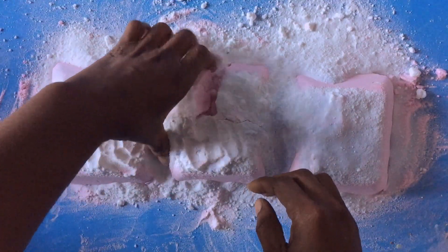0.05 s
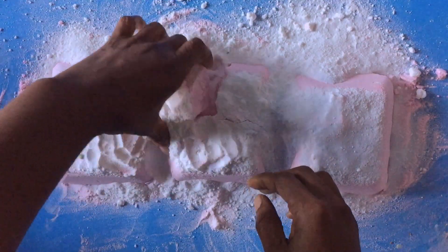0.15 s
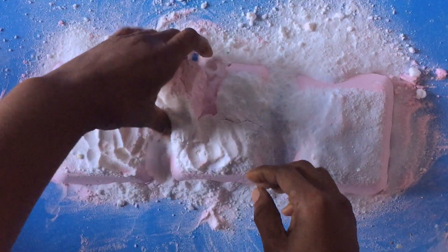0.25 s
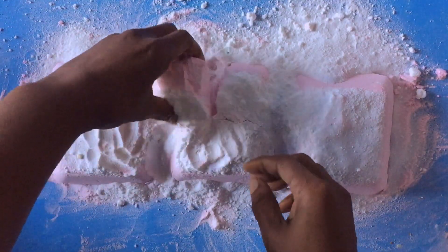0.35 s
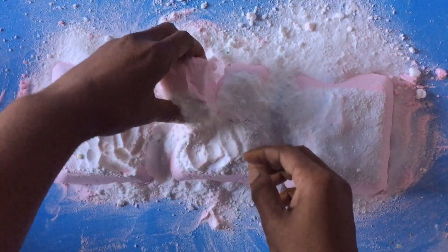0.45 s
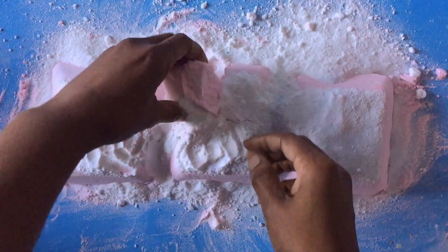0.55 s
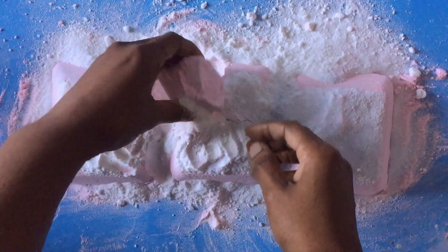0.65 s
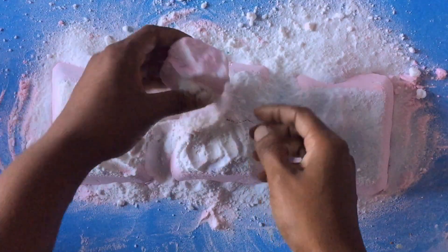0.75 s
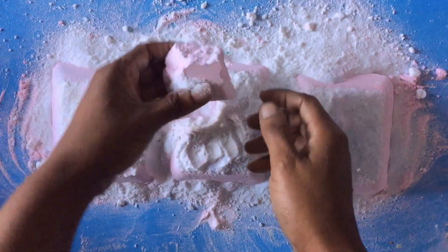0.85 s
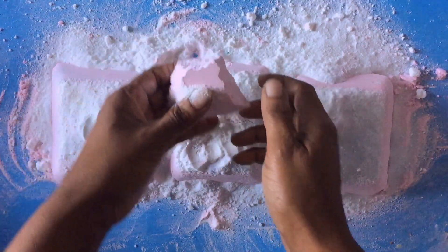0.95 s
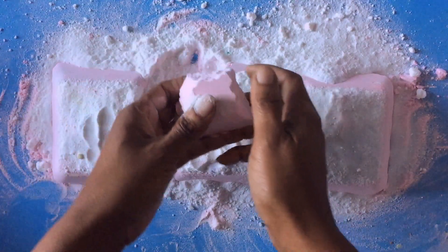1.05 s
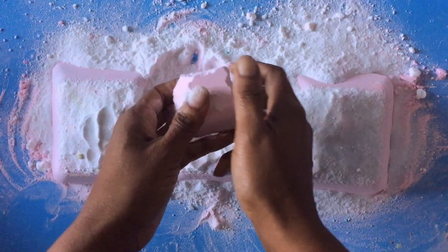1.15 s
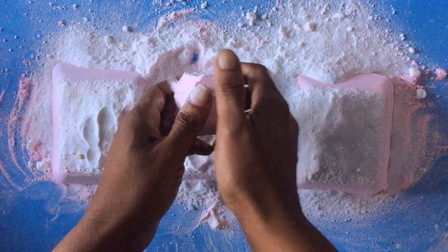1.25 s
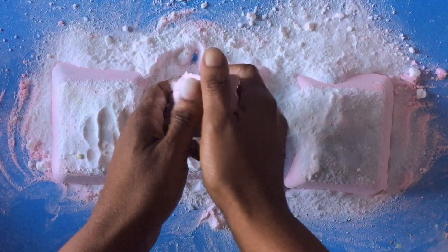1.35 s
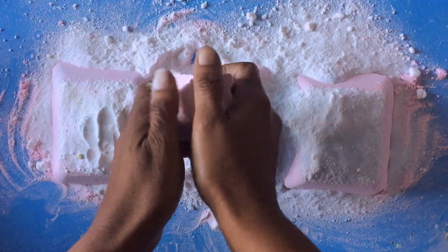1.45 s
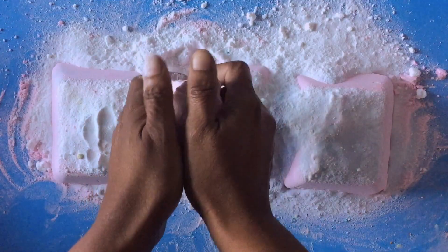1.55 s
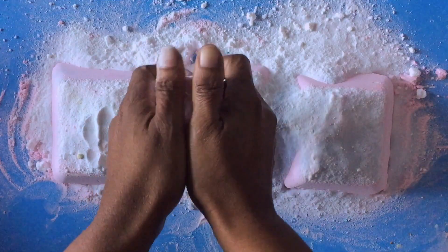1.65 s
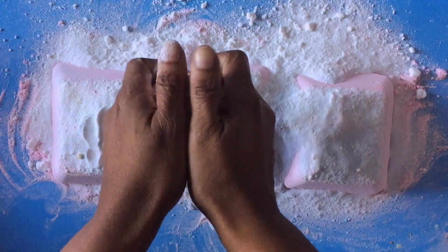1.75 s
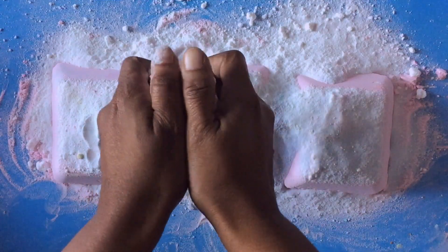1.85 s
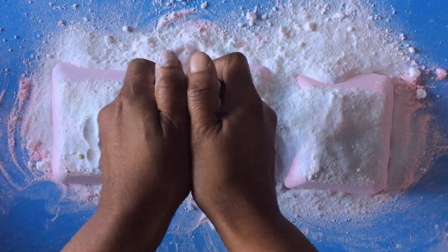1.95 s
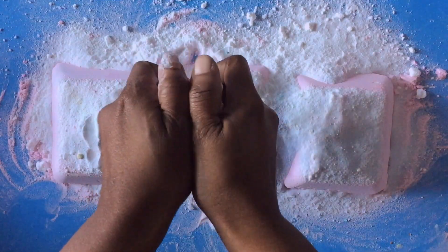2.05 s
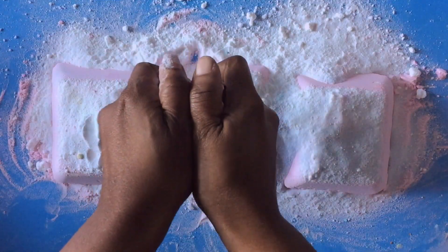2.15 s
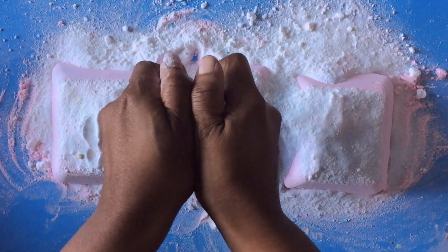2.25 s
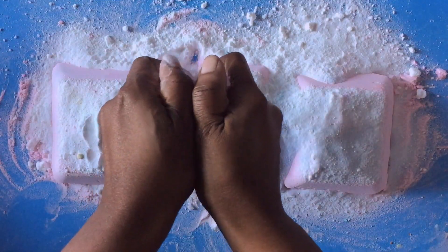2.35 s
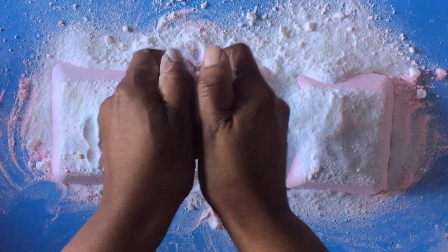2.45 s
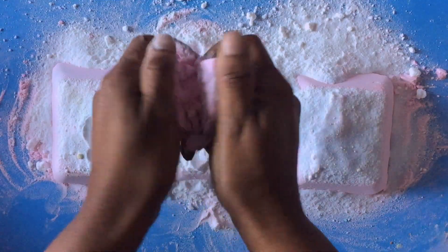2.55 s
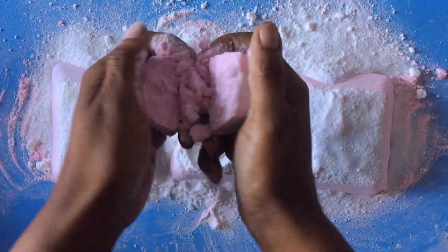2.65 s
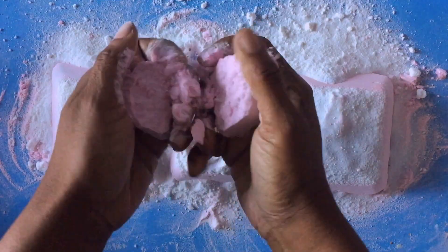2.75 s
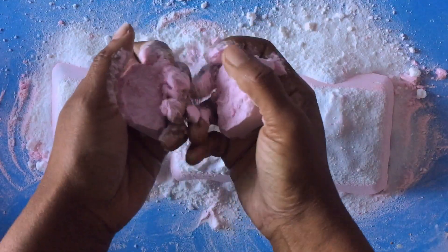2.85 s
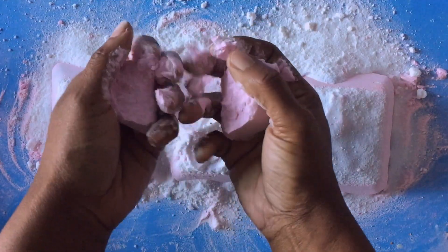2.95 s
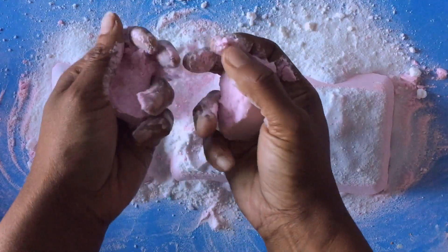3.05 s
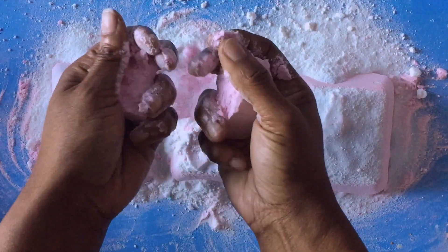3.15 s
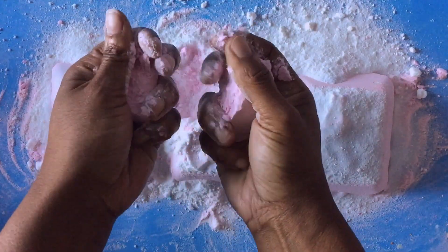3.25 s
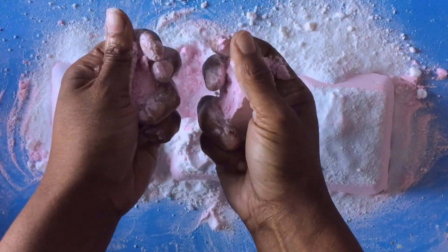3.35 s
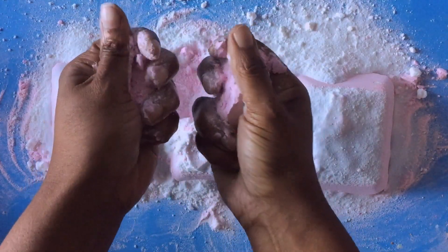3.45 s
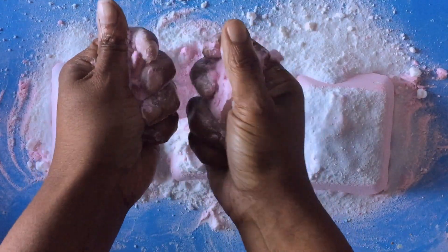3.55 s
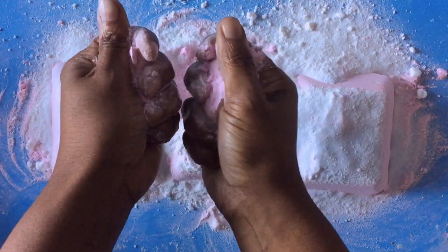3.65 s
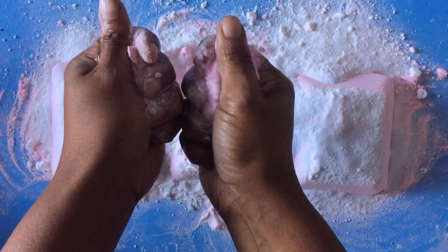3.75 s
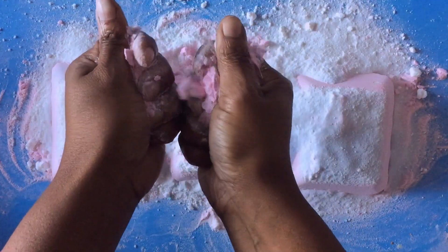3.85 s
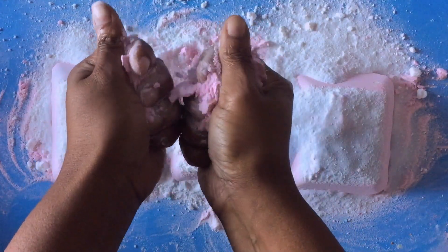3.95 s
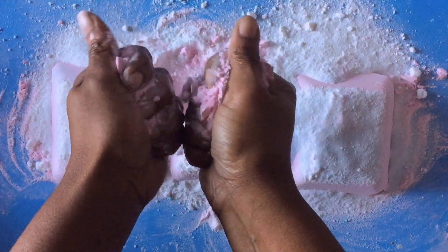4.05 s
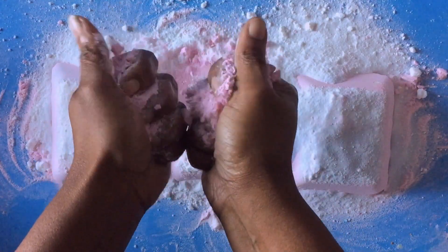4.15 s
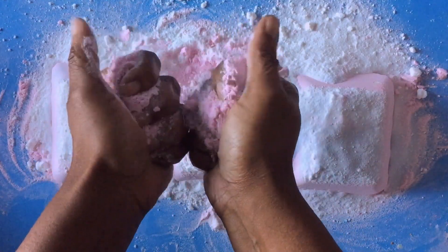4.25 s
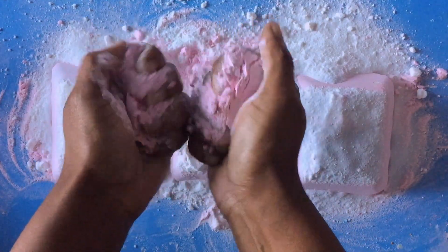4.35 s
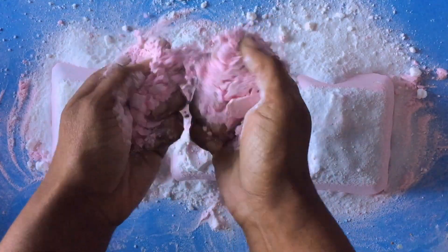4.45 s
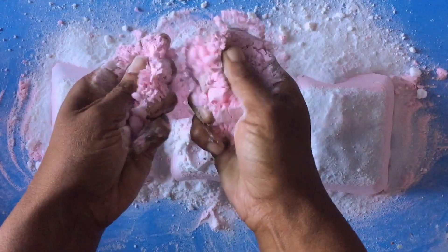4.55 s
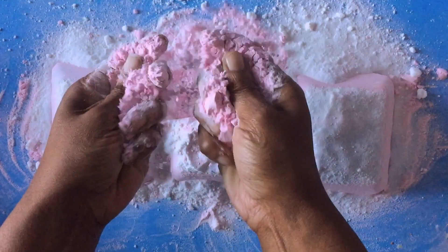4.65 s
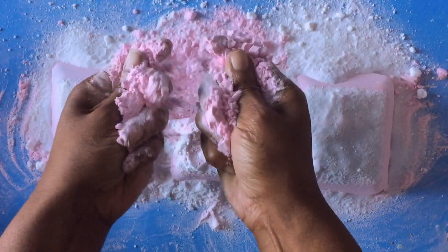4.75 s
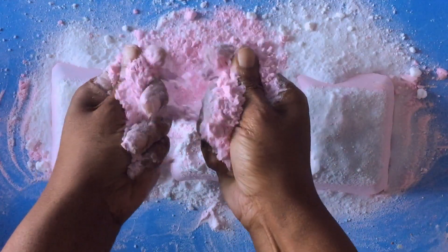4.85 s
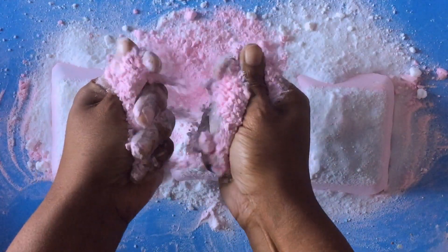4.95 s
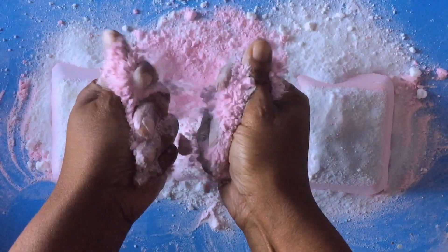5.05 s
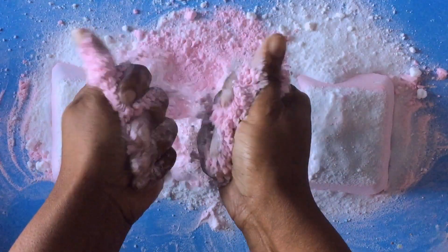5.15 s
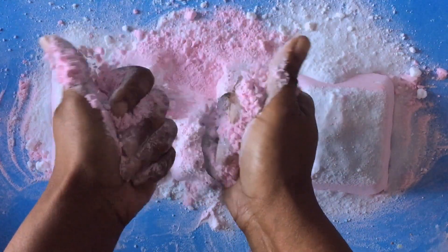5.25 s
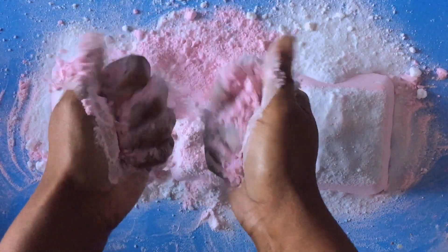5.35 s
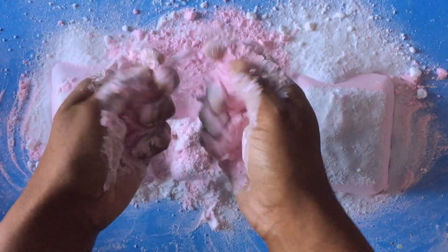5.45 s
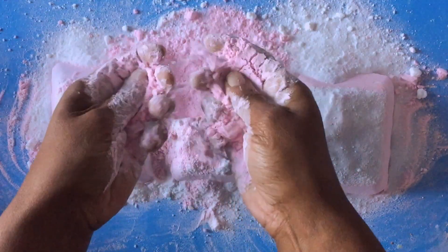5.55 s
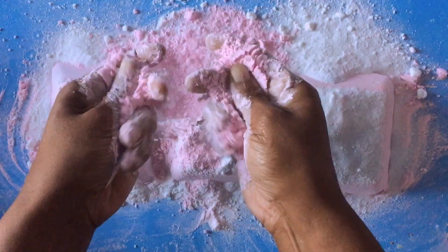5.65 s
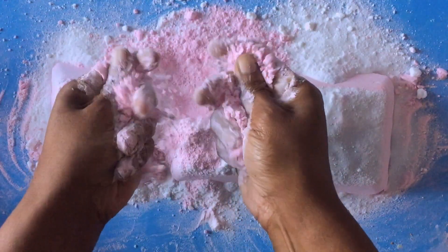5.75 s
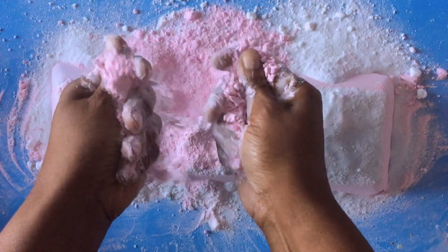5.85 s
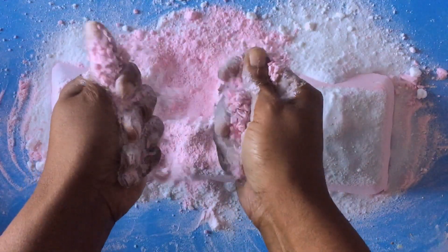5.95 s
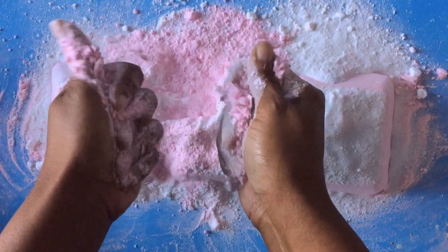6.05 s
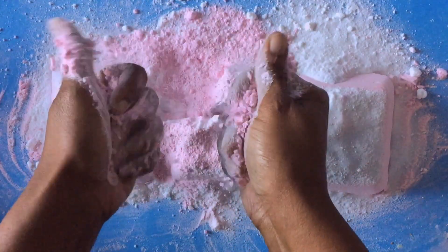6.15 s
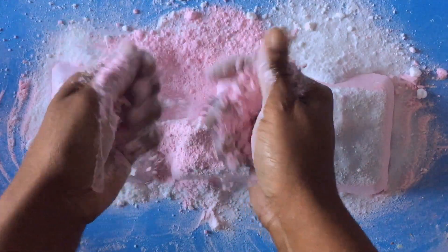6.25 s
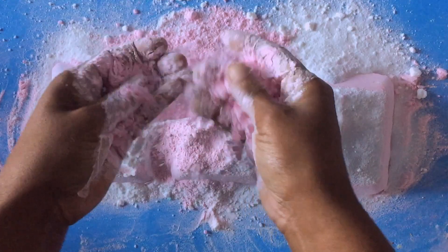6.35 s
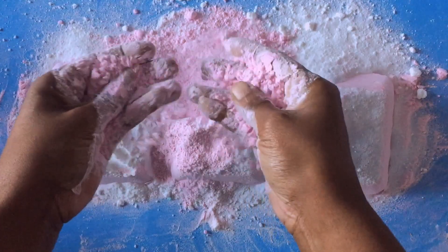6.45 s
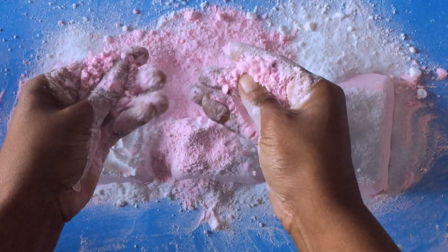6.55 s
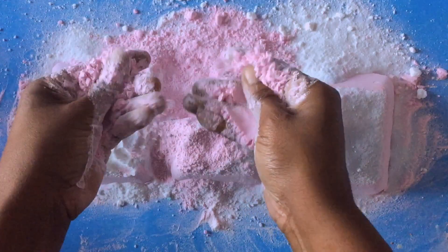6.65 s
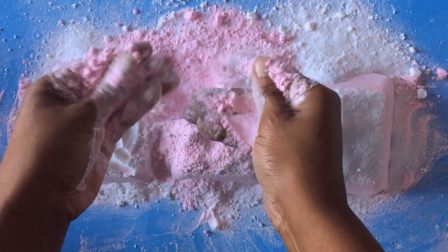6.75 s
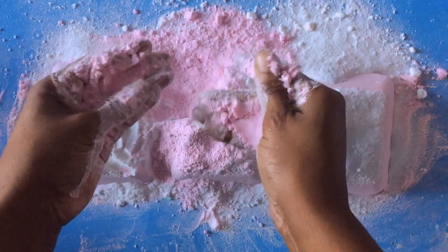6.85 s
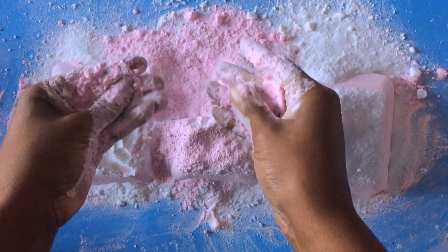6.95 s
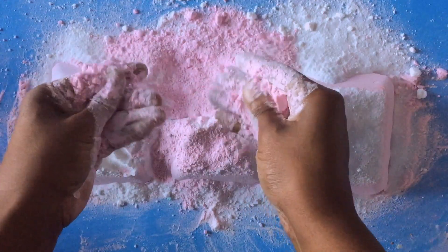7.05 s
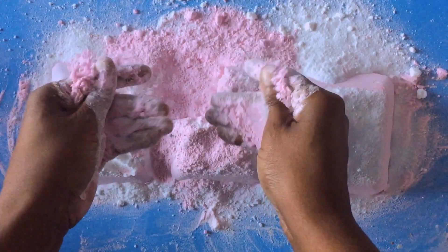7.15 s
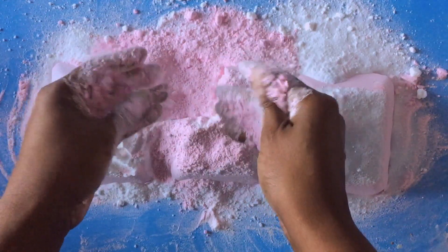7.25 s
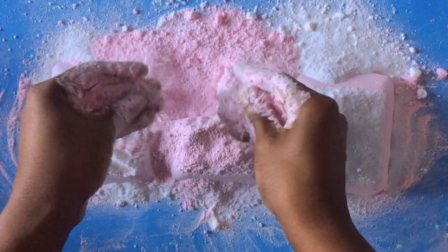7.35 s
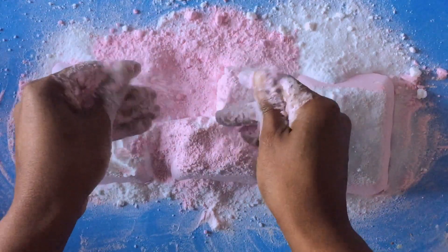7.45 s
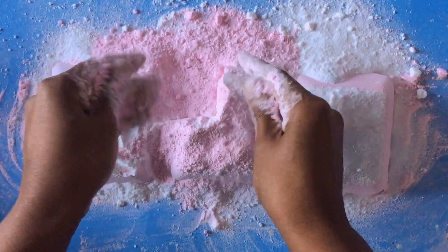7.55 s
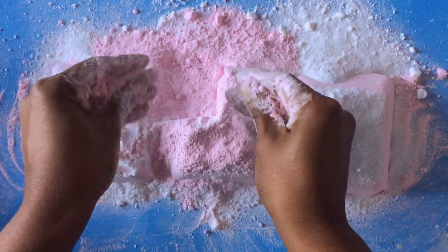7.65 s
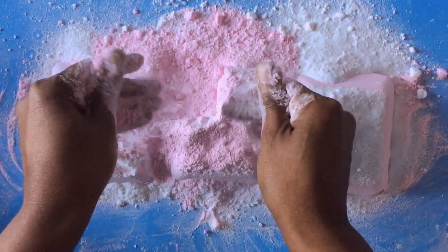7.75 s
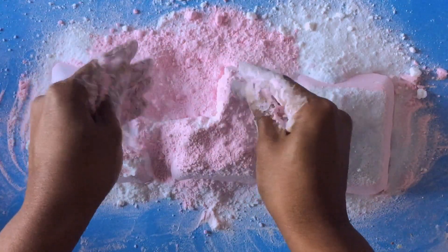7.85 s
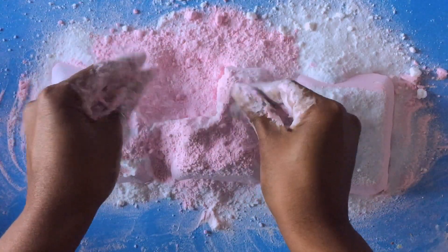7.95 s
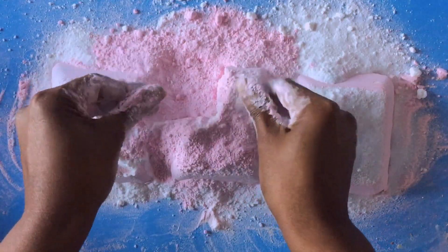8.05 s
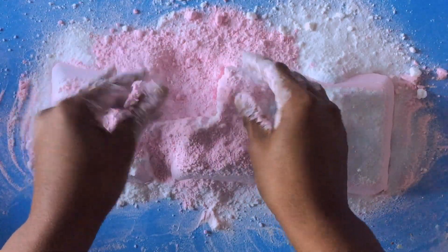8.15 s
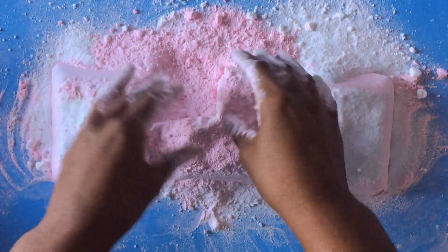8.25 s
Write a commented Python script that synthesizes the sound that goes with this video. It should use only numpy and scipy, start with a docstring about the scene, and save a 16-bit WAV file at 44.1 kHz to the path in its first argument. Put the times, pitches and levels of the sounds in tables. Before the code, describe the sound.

Hands squeeze a lump of packed starch close up; it cracks, creaks and crunches in jerks, then crumbles into soft powdery finger rubbing.

```python
"""A quiet room: two hands crush a lump of packed starch close to a microphone, over a tray.
The powder yields in stick-slip jerks, sums of damped grains that ring the lump; even creaks are slip trains.
Lumps snap as decaying noise bursts, one break thumps on the tray's modes, powdered fingers rub as moving
bands of hiss, and fingertips scrape as gritty noise.
Shaped noise makes a low rumble, and a sine of unsteady pitch and level makes a wavering hum."""
import sys
import numpy as np
from scipy import signal
from scipy.fft import rfft, irfft, next_fast_len
from scipy.io import wavfile
from scipy.ndimage import map_coordinates

SR = 44100
rng = np.random.default_rng(int(sys.argv[2]) if len(sys.argv) > 2 else 0)


def magnitude_from_level(level_db):
    """Linear magnitude for a level in decibels (20 dB per decade)."""
    exponent = np.asarray(level_db, float) / 20
    return 10 ** exponent


def store_wav(level_fs):
    """Save 16-bit WAV to argv[1]."""
    pcm = np.round(np.clip(np.atleast_2d(level_fs), -1, 1) * 32767)
    wavfile.write(sys.argv[1], SR, pcm.T.astype(np.int16))


N = 366030


def unit(x):
    """Normalization: scales x to rms 1."""
    return x / np.sqrt(np.mean(x ** 2) + 1e-20)


def curves(rows):
    """Linear interpolation: one value per sample for each column after the time."""
    s, *cols = np.transpose(rows)
    return [np.interp(np.arange(N) / SR, s, c) for c in cols]


def filtered(x, response):
    """Linear filtering: the spectrum of x times a complex response of frequency."""
    m = next_fast_len(N + 8192)
    return irfft(rfft(x, m) * response(np.fft.rfftfreq(m, 1 / SR)), m)[:N]


def peak(f, hz, width):
    """Damped resonance: a causal second-order response of gain 1 at hz."""
    return 1j * f * width / (hz * hz - f * f + 1j * f * width)


def noise(spectrum):
    """Spectral shaping: noise of rms 1 coloured by (frequency [Hz], level [dB]) points."""
    hz, db = np.transpose(spectrum)
    white = rng.standard_normal(N)
    return unit(filtered(white, lambda f: magnitude_from_level(np.interp(np.log(f + 1), np.log(hz + 1), db))))


def wobble(rate):
    """Band-limited fluctuation: a smooth random curve with rate knots a second."""
    knots = rng.standard_normal(int(N * rate / SR) + 4)
    return map_coordinates(knots, [np.arange(N) * rate / SR])


def scatter(times, shapes):
    """Superposition: adds each row of shapes at its time."""
    starts = np.round(np.asarray(times) * SR).astype(int)[:, None]
    at = starts + np.arange(shapes.shape[1])
    return np.bincount(at.ravel(), shapes.ravel(), N + shapes.shape[1])[:N]


def grains(times, size, spread, hz, cycles, length):
    """Damped oscillation: pushes of log-normal pitch whose decay constant is counted in cycles."""
    f = np.clip(hz * np.exp(spread), 60, 15000)[:, None]
    t = np.arange(length) / SR
    onset = 1 - np.exp(-t / 0.00013)
    pushes = size[:, None] * np.sin(2 * np.pi * f * t) * np.exp(-f * t / cycles) * onset
    return unit(scatter(times, pushes))


def bursts(hz, octaves, t60, tail_db):
    """Fracture noise: rows of band noise around hz with a fast and a slow decay, each of peak 1."""
    t, f = np.arange(2048) / SR, np.fft.rfftfreq(2048, 1 / SR)
    white = rng.standard_normal((len(hz), len(t)))
    band = irfft(rfft(white) * np.exp(-(np.log2((f + 1) / hz) / octaves) ** 2))
    decay = magnitude_from_level(-60 * t / t60) + magnitude_from_level(tail_db - 60 * t / 0.1)
    rows = band * decay * (1 - np.exp(-(t / 0.00075) ** 2))
    return rows / np.abs(rows).max(axis=1, keepdims=True)


def room():
    """Stationary background: shaped rumble and hiss, resonant noise bands and one wavering sine."""
    # Spectrum of the rumble and hiss, scaled as a whole below: (frequency [Hz], relative density [dB per Hz])
    room_spectrum = [(4.7, -30), (8.0, 8.5), (57, -5.5), (77, -10.5), (131, -11), (181, -24.5),
                     (240, -16.5), (273, -27), (364, -25), (550, -33), (886, -37.5), (2370, -42.5),
                     (4340, -45.5), (4930, -50), (16000, -87)]
    # Narrow rumble bands, two equal resonances each: (frequency [Hz], width of one [Hz], level [dB])
    hum_bands = [(50, 10.6, -54), (121.9, 10.4, -70), (366.5, 37, -83.5)]
    # Wavering tone: (centre frequency [Hz], level before a lift of 2 dB [dB])
    drone_tone = (244, -68)
    hum = 0
    for hz, width, db in hum_bands:
        white = rng.standard_normal(N)
        hum = hum + magnitude_from_level(db) * unit(filtered(white, lambda f: peak(f, hz, width) ** 2))
    drone_hz, drone_db = drone_tone
    turns = np.cumsum(drone_hz * (1 + 0.0075 * wobble(7))) / SR
    drone = magnitude_from_level(drone_db + 2.0 + 3.0 * wobble(7.7)) * np.sin(2 * np.pi * turns)
    return magnitude_from_level(-49) * noise(room_spectrum) + hum + drone


def walls(x):
    """Diffuse reverberation: convolution with a short, exponentially decaying noise of unit energy."""
    t = np.arange(6000) / SR
    tail = rng.standard_normal(len(t)) * magnitude_from_level(-60 * t / 0.37)  # 60 dB in 0.37 s
    return signal.fftconvolve(x, tail / np.linalg.norm(tail))[:N]


def fingers():
    """Energy addition: bell-shaped strokes over slow shifting give level [dB]; the louder sets the speed."""
    # Finger strokes: (middle [s], half length [s], level [dB], relative speed [-], higher is faster)
    stroke_rows = [(0.047, 0.018, -61, -1.4), (0.123, 0.053, -55.5, -0.87), (0.378, 0.036, -67.5, -1.7),
                   (.42, 0.037, -66, -1), (0.556, 0.035, -65.5, -0.78), (1.135, 0.04, -70, -0.5),
                   (1.583, 0.03, -69, -0.7), (1.89, 0.063, -68.5, -0.8), (2.392, 0.053, -63, -2.1),
                   (2.993, 0.11, -70, -0.59), (4.475, 0.082, -63, -0.31), (4.66, 0.025, -67, -1.2),
                   (4.76, 0.065, -60, -1), (5.244, 0.1, -62, 0.12), (5.457, 0.084, -63, -0.35),
                   (5.95, 0.067, -58.5, -0.26), (6.111, 0.073, -61.5, -0.041), (6.235, 0.044, -62, -0.44),
                   (6.723, 0.17, -61.5, -0.88), (6.84, .05, -67, 0.35), (7.176, 0.056, -56.5, -0.44),
                   (7.283, 0.038, -60, -0.57), (7.436, 0.045, -60.5, -0.56), (7.523, 0.053, -57.5, -0.44),
                   (7.644, 0.046, -57, -0.54), (7.708, .03, -60.5, -0.48), (7.774, 0.036, -54, -0.33),
                   (7.818, 0.021, -62, -0.5), (7.905, 0.032, -56, -0.18), (8.01, 0.061, -58.5, -0.079),
                   (8.176, 0.042, -61, -0.23)]
    # Fingers shifting between strokes: (time [s], level [dB], relative speed [-])
    shifting = [(0, -72.5, -0.92), (.3, -70, -1.05), (.47, -74.5, -.3), (.7, -70, -1.5), (.82, -75, -0.4),
                (1.35, -70.5, -0.5), (1.67, -73, 0.1), (2.1, -70.5, -1.15), (2.6, -71.5, -.7),
                (2.87, -72, -0.37), (3.3, -65.5, -0.95), (4.0, -64, -0.6), (4.36, -74, 1),
                (4.87, -63, -2.5), (5.05, -61, -0.85), (5.6, -68, -0.55), (5.85, -60.5, -1.55),
                (6.38, -68.5, -0.14), (6.65, -75, -0.6), (7.08, -62, -0.73), (7.36, -72.5, -0.19),
                (8.1, -60.5, -0.4), (8.25, -75, -0.22)]
    squareness = 2.3  # 2 = bell, higher = flatter top and steeper ends
    t = np.arange(N) / SR
    level_db, speed = curves(shifting)
    power = magnitude_from_level(level_db) ** 2
    moved = power * speed
    for middle, half, db, stroke_speed in stroke_rows:
        stroke = magnitude_from_level(db) ** 2 * np.exp(-2 * np.abs((t - middle) / half) ** squareness)
        power, moved = power + stroke, moved + stroke_speed * stroke
    return 10 * np.log10(power), moved / power


def rub(count=9000):
    """Sliding friction: powdered skin makes hiss with fine crackle, its colour climbing with speed."""
    # Hiss bands, two equal resonances each:
    # (frequency [Hz], width of one [Hz], relative speed that excites it most [-])
    skin_bands = [(1000, 1970, -1.47), (2170, 2930, -1.16), (4130, 6150, -0.73), (6480, 7800, 0.14),
                  (10640, 9700, 0.32)]
    level_db, speed = fingers()
    u, z = rng.random(count), rng.standard_normal(count)
    clicks = magnitude_from_level(np.clip(8.8 * z, -30, 9)) * np.sign(z)
    crackle = scatter(u * (N - 100) / SR, clicks[:, None])
    hiss = rng.standard_normal(N) * magnitude_from_level(1.5 * wobble(90)) + magnitude_from_level(-3) * unit(crackle)
    coloured = 0
    for hz, width, best in skin_bands:
        band = unit(filtered(hiss, lambda f: peak(f, hz, width) ** 2))
        coloured = coloured + band * np.exp(-((speed - best) / 0.9) ** 2)
    # Soft skin has no extreme treble
    return filtered(magnitude_from_level(level_db) * coloured, lambda f: 1 / (1 + (f / 14500) ** 4))


def scrape():
    """Friction-driven resonance: a short gritty drag swells, stops dead and rings the crust."""
    # Fingertips drag over the crust: (start [s], end [s], level before the swell [dB])
    drag = (0.092, 0.15, -52.5)
    # Crust bands, two equal resonances each: (frequency [Hz], width of one [Hz], relative gain [dB])
    crust_bands = [(4000, 1500, 1.5), (7000, 2000, 0)]
    t, (start, end, db) = np.arange(N) / SR, drag
    swell_db = np.interp(t, [start - .03, start, end, end + .012, end + .06], [-46, -3.5, 3.0, -14, -45])
    grit = rng.standard_normal(N) * magnitude_from_level(5 * wobble(260))
    crust = lambda f: sum(magnitude_from_level(gain) * peak(f, hz, width) ** 2 for hz, width, gain in crust_bands)
    return magnitude_from_level(db + swell_db) * (swell_db > -39) * unit(filtered(grit, crust))


def thump():
    """Modal excitation: the sudden break shoves the hands and rings the tray's low modes."""
    # The lump gives way: (time [s], level [dB])
    break_rows = [(2.3327, -26)]
    # Tray modes: (frequency [Hz], level relative to the break [dB], 60 dB decay time [s])
    tray_modes = [(133, -11.5, 0.15), (221, 7, 0.041), (322, -2.5, 0.054), (417, -6, 0.032)]
    t = np.arange(8000) / SR
    # The modes are in phase 3 ms after the start, following a short pull
    ring = sum(magnitude_from_level(db - 60 * t / t60) * np.cos(2 * np.pi * hz * (t - .003)) for hz, db, t60 in tray_modes)
    s, db = np.transpose(break_rows)
    return scatter(s, magnitude_from_level(db)[:, None] * ring * (1 - np.exp(-(t / .0015) ** 2)))


def creaks():
    """Regular stick-slip: a loaded lump gives trains of small, nearly even cracks around one pitch."""
    # Creak trains: (start [s], end [s], rate [slips/s], centre pitch [Hz], median peak level [dB])
    creak_trains = [(1.949, 2.06, 98, 2490, -52.5), (2.079, 2.14, 80, 1900, -51),
                    (3.409, 3.56, 80, 2200, -46.5), (3.887, 4.011, 94, 2180, -42.5),
                    (4.215, 4.3, 86, 2000, -40), (6.461, 6.536, 70, 1000, -42.5),
                    (6.611, 6.71, 54, 1200, -46), (6.754, 6.852, 91, 2000, -53)]
    most = 14  # slips in a train at most
    slips = []
    for start, end, rate, hz, db in creak_trains:
        slips += [(s, end, rate, hz, db) for s in start + np.arange(most) / rate]
    s, end, rate, hz, db = np.transpose(slips)
    z = rng.standard_normal((len(s), 3))
    size = magnitude_from_level(db + 1.6 * z[:, 0]) * (s < end)
    pitch = hz * np.exp(0.13 * z[:, 2])
    cracks = bursts(pitch[:, None], octaves=0.92, t60=0.009, tail_db=-30)
    return scatter(s + 0.06 * z[:, 1] / rate, size[:, None] * cracks)


def snaps():
    """Brittle fracture: a dry burst with a sharp start, a weak after-crumble, a fine tick and a dull thud."""
    # Lumps cracking: (time [s], peak level of the burst alone [dB], pitch [Hz],
    # thud level relative to the burst before a lift of 4.5 dB [dB])
    snap_rows = [(0.64, -49, 6950, -17), (0.677, -43.5, 5970, -17), (0.696, -46, 3240, -22),
                 (0.72, -41.5, 3320, -22), (0.744, -48, 3400, -22), (0.76, -56, 6000, -11),
                 (1.804, -55, 6000, -20), (2.067, -32.5, 2700, -39), (2.142, -53, 2010, -14),
                 (2.161, -31.5, 2230, -16), (2.173, -43, 2960, -26), (2.189, -45, 2970, -15),
                 (2.22, -32.5, 2050, -13.5), (2.268, -51, 2200, -20), (2.285, -51, 3000, -12),
                 (2.324, -50, 2200, -20), (2.333, -34, 2510, -2), (2.356, -45, 1800, -15),
                 (2.368, -45, 1600, -15), (2.376, -41, 2400, -19), (2.382, -42, 1500, -5),
                 (2.394, -36, 1590, -8), (2.407, -37, 1600, -17), (2.416, -40, 2330, -11),
                 (2.423, -40, 1590, -15), (2.442, -34.5, 1650, -22), (2.464, -37, 1670, -21),
                 (2.487, -48, 1300, -20), (2.505, -50, 1500, -20), (2.53, -52, 1600, -20),
                 (2.992, -38.5, 3960, -31), (3.001, -40.5, 6950, -27), (3.276, -42, 1580, -22),
                 (3.475, -40, 2490, -3), (3.576, -37, 1010, -26), (3.608, -38.5, 2080, 5),
                 (3.693, -29, 1420, -2), (3.772, -32.5, 881.4, -2), (3.8, -36, 1720, -22),
                 (3.818, -32.5, 1010, 7.5), (3.931, -37, 1010, -25), (4.135, -33, 1140, 2.5),
                 (4.234, -28, 990, -8), (4.307, -36, 1994, 4), (4.37, -60, 7000, -20),
                 (4.384, -54, 7000, -20), (4.396, -32, 5100, -9), (4.443, -33, 4000, -17),
                 (4.472, -30, 1140, -5), (4.52, -44.5, 5370, -18), (4.564, -46, 814, -27),
                 (4.615, -48, 6855, -24), (4.62, -44, 5500, -24), (4.625, -37.5, 2820, -14),
                 (4.639, -33, 5440, -34), (4.662, -49, 5500, -20), (4.684, -46, 6000, -18),
                 (4.689, -21, 3103, -37), (4.699, -36, 3800, -25), (4.71, -33, 3360, -17),
                 (4.737, -41, 3300, -20), (4.749, -44, 3500, -15), (4.773, -43, 4500, -20),
                 (4.803, -45, 5000, -20), (4.854, -37, 1700, -7), (5.105, -37, 1200, -5),
                 (4.928, -36, 1500, -8), (4.998, -33, 899.5, -3), (5.011, -35.5, 1200, -15),
                 (5.035, -34, 1300, -10), (5.168, -38, 923, 8.5), (5.214, -41, 2600, 9),
                 (5.612, -37, 3200, -28), (6.484, -37.5, 4000, -45), (6.541, -39, 980.4, 4),
                 (6.579, -43, 1070, -21), (6.974, -45, 4530, -21), (7.125, -46.5, 500, 3),
                 (7.308, -43.5, 2873, -16), (7.318, -46, 3270, -2)]
    s, db, hz, thud_db = np.transpose(snap_rows)[:, :, None]
    t = np.arange(2048) / SR
    crack = bursts(hz, octaves=1.0, t60=0.0076, tail_db=-22.5)
    # Tick relative to the crack: -13.5 dB at -40 dB and 2 kHz; less for bigger cracks, 6 dB more per octave
    tick_db = -13.5 - 0.42 * (db + 40) + 6 * np.log2(hz / 2000)
    tick = magnitude_from_level(tick_db) * bursts(np.full_like(hz, 6800), octaves=0.86, t60=0.0076, tail_db=-29)
    spike = 0.8 * np.sin(2 * np.pi * hz * t) * np.exp(-hz * t / 0.9)  # the first break is one sharp push
    thud = magnitude_from_level(thud_db + 4.5) * np.sin(2 * np.pi * 330 * t) * magnitude_from_level(-60 * t / 0.0087)
    return scatter(s[:, 0], magnitude_from_level(db) * (crack + spike + tick + thud))


def effort():
    """Energy addition: level shapes of the squeezes add up to the jerk and edge levels [dB]."""
    # Squeezes: level shapes around a grip and a hardest moment; in a few the end time comes earlier,
    # so the level drops abruptly: (grip [s], hardest [s], end time [s],
    # jerk level at the hardest before the lump rings [dB],
    # bright edge relative to the jerk [dB], high for hard lumps and low for powder)
    squeezes = [(2.074, 2.176, 2.34, -70, 7.5), (2.346, 2.387, 2.45, -57.5, 6), (2.987, 3.01, 3, -67, 1),
                (3.375, 3.62, 5.26, -56, -1), (3.834, 4.245, 4.31, -43, -7), (4.416, 4.465, 4.27, -53, -19),
                (4.691, 4.847, 5.1, -43, -20), (4.914, 5.007, 5.18, -44, -14),
                (5.12, 5.225, 5.37, -45.5, -31), (5.64, 5.717, 5.79, -48, -17),
                (5.773, 5.926, 6.1, -45, -19), (6.488, 6.566, 6.69, -52, -10), (6.676, 6.781, 6.8, -58, -8),
                (7.08, 7.13, 7.19, -55, -22)]
    grip_s, end_s = 0.087, 0.16  # spacing of the level points before the grip and after the end time
    grip_db, end_db, fade_db = -7.5, -7.5, -25  # relative to the hardest moment
    t, dull, edge = np.arange(N) / SR, 1e-12, 1e-12
    levels = [3 * fade_db, fade_db, grip_db, 0, end_db, fade_db, 3 * fade_db]
    for grip, hardest, end, db, edge_db in squeezes:
        times = [grip - 3 * grip_s, grip - grip_s, grip, hardest, end, end + end_s, end + 3 * end_s]
        shape_db = np.interp(t, times, levels)
        dull = dull + magnitude_from_level(db + shape_db) ** 2
        edge = edge + magnitude_from_level(db + edge_db + shape_db) ** 2
    return 10 * np.log10(dull), 10 * np.log10(edge)


def crunch(count=5200):
    """Stick-slip in packed grains: each jerk is a dull push with a bright edge, ringing the lump."""
    # How often the packed powder lets go: (time [s], central rate [releases/s])
    slip_rate = [(1.9, 101), (2.33, 77), (2.65, 95), (3.1, 99.6), (3.22, 86.2), (3.75, 77), (3.87, 89.2),
                 (4.17, 79.4), (4.31, 68), (4.7, 65.0), (5.18, 78.7), (5.62, 72.4), (5.98, 82.5),
                 (6.53, 76.7), (6.8, 98), (7.3, 77.3)]
    # Lump resonances: (frequency [Hz], width [Hz], gain before a common cut of 5 dB [dB])
    lump_modes = [(227, 24, 8.5), (324, 28, 6.5), (469, 69, 4), (695, 30, 0), (770, 23, -1.5),
                  (1010, 60, 5.5), (1153, 25, -1.5), (1482, 38, 5), (1805, 55, 0), (2126, 330, 5.5),
                  (2970, 67, 5.5)]
    u, z = rng.random((count, 2)), rng.standard_normal((count, 4))
    times = (np.arange(count) + 2.5 * u[:, 0]) * N / SR / (count + 4)  # uneven but unbroken stream of slips

    # Stress builds and lets go; each release swells fast and sags
    load = np.cumsum(curves(slip_rate)[0] * magnitude_from_level(1.3 * wobble(30))) / SR % 1
    release = np.sin(np.pi * load ** 0.6) ** 2
    dull_db, edge_db = effort()
    # Hard lumps fall quieter between releases, powder keeps trickling
    depth_db = np.clip(19 + 0.6 * (edge_db - dull_db), 11, 14)
    # The largest slips crowd into each release
    crowding_db = (depth_db * (release - 0.6))[(times * SR).astype(int)]
    outward = np.where(u[:, 1] < .7, 1, -1)  # most slips push outward
    size = magnitude_from_level(np.clip(2.6 * z[:, 3] + crowding_db, -30, 7)) * outward

    dull = grains(times, size, 0.53 * z[:, 0], hz=520, cycles=0.3, length=790)
    edge = grains(times, size * magnitude_from_level(2.8 * z[:, 2]), 0.58 * z[:, 1], hz=2085, cycles=0.93, length=200)
    # The larger slips spit grit
    grit = grains(times, np.abs(size) ** 1.6, 0.3 * z[:, 0], hz=4700, cycles=2, length=100)
    edge = edge + 0.2 * grit
    # Countless finer slips blur into noise under the jerks
    powder = rng.standard_normal(N) * (0.5 + release)
    dull = dull + 0.38 * unit(filtered(powder, lambda f: peak(f, 900, 400)))
    edge = edge + 0.045 * unit(filtered(powder, lambda f: peak(f, 1100, 890)))
    # Each release sprays fine grit
    spray = rng.standard_normal(N) * (0.15 + release) * magnitude_from_level(2.5 * wobble(70))
    edge = edge + 0.47 * unit(filtered(spray, lambda f: peak(f, 2940, 5400) ** 2))

    jerks = magnitude_from_level(dull_db) * dull + magnitude_from_level(edge_db) * edge
    body = lambda f: 0.92 + sum(magnitude_from_level(db - 5) * peak(f, hz, width) for hz, width, db in lump_modes)
    # A small lump radiates no deep bass
    return filtered(jerks, lambda f: body(f) * 1j * f / (130 + 1j * f))


def scene():
    """Superposition of sources: hands close to the microphone, a weak echo of them, and the room."""
    hands = crunch() + snaps() + creaks() + thump()
    echo = magnitude_from_level(-13) * walls(hands)
    return (hands + echo + rub() + scrape() + room())[None]


def low_pass(x):
    """Removes everything above the highest recorded frequency."""
    return signal.sosfilt(signal.butter(12, 16450, fs=SR, output="sos"), x)


def record(dry):
    """Additive self-noise and band limiting: the microphone adds a faint steady hiss, cut at 15850 Hz."""
    hiss = magnitude_from_level(-77.5) * noise([(1500, -19), (5000, -15.5), (16000, 0)])
    heard = filtered(dry[0] + hiss, lambda f: f < 15850)
    return low_pass(heard[None])


dry = scene()
out = record(dry)
store_wav(out)
```